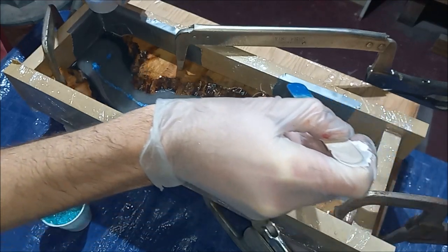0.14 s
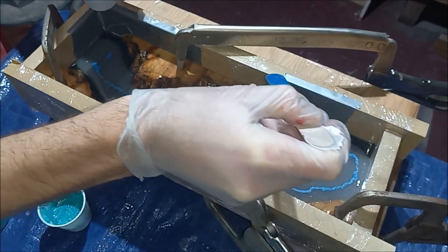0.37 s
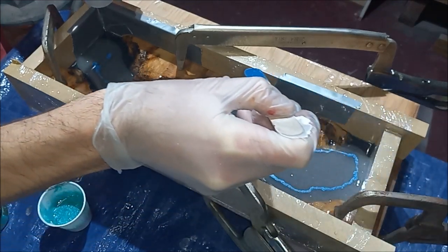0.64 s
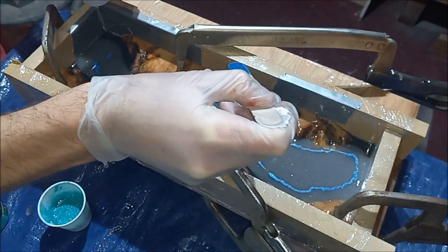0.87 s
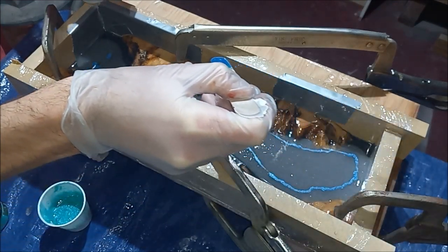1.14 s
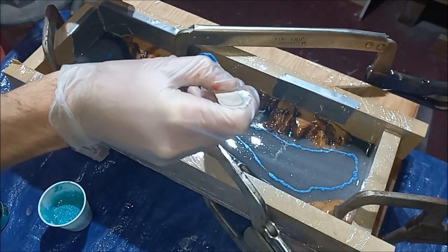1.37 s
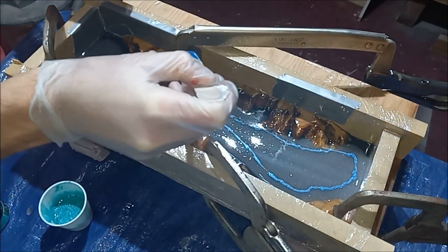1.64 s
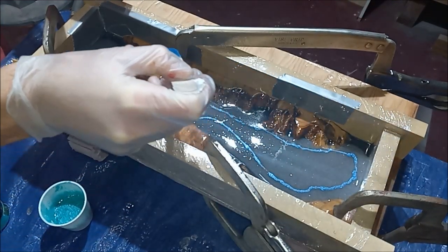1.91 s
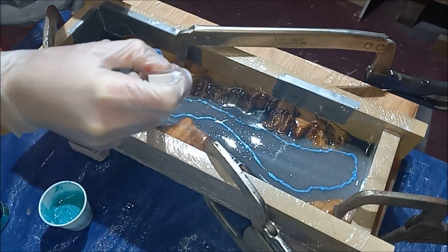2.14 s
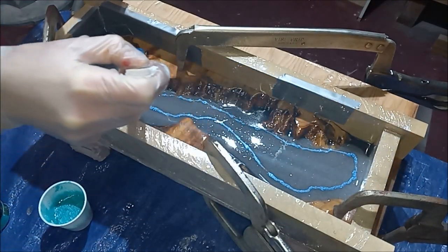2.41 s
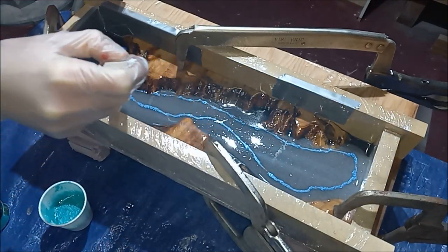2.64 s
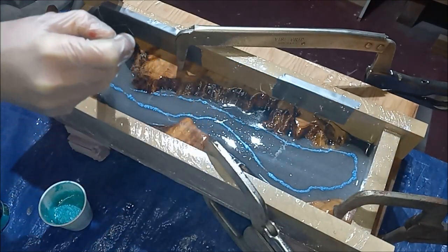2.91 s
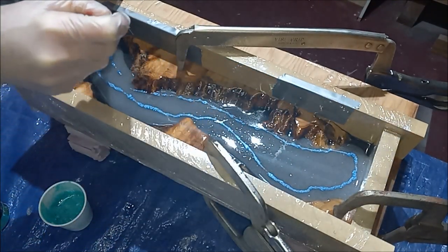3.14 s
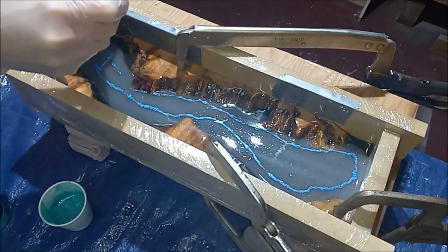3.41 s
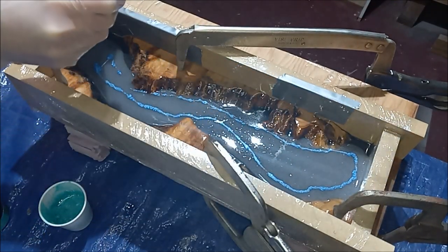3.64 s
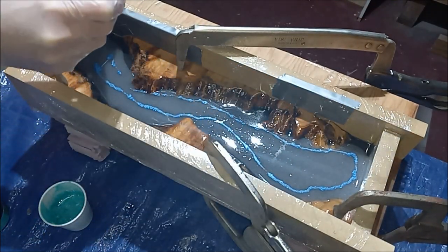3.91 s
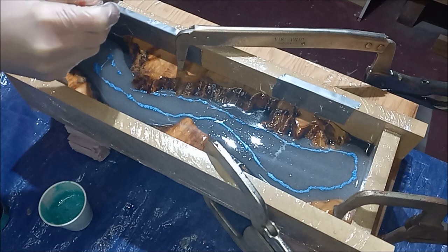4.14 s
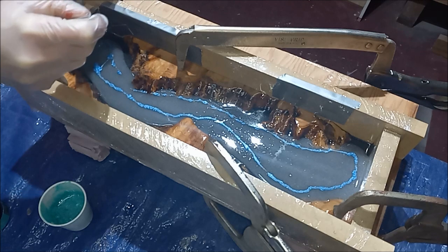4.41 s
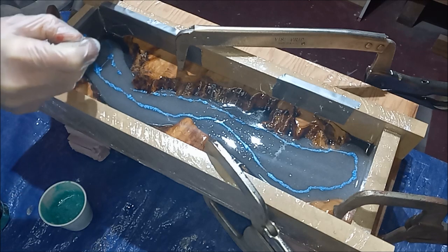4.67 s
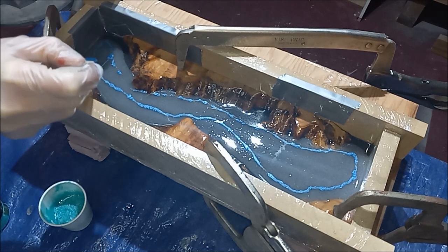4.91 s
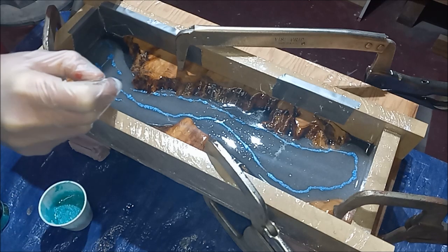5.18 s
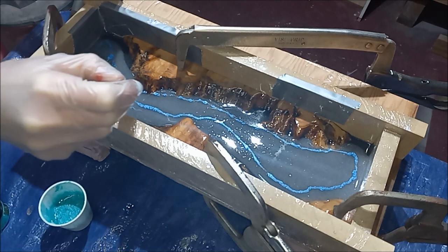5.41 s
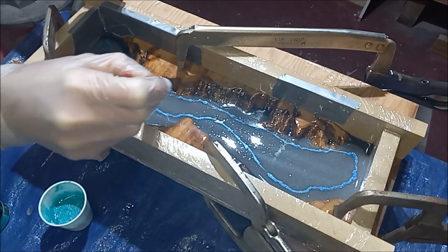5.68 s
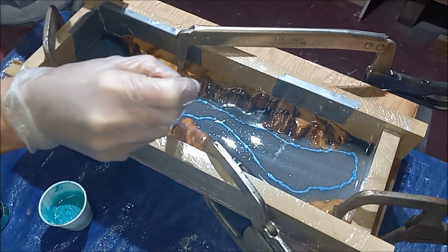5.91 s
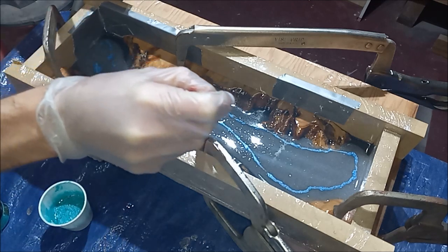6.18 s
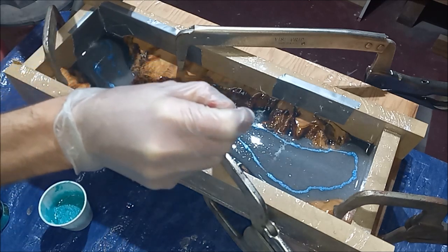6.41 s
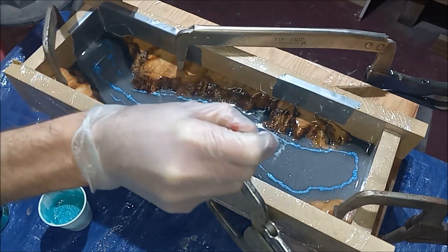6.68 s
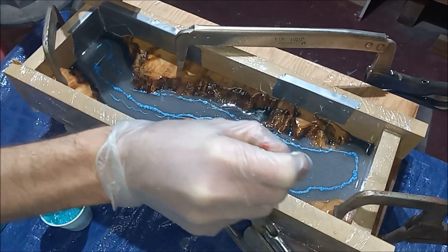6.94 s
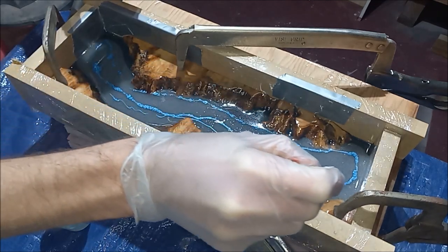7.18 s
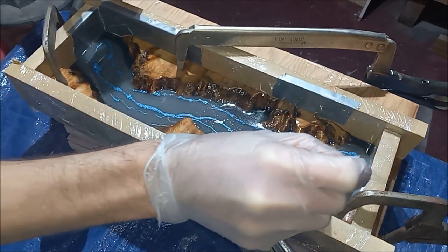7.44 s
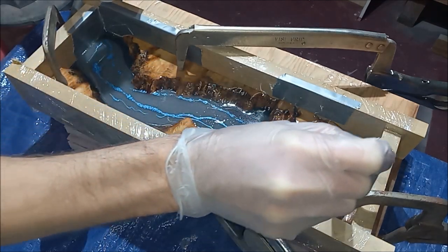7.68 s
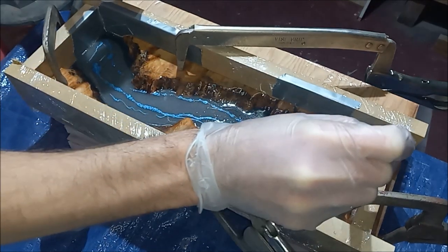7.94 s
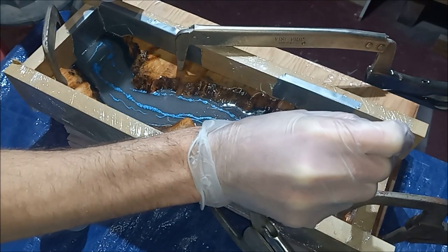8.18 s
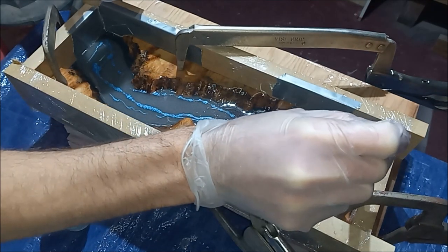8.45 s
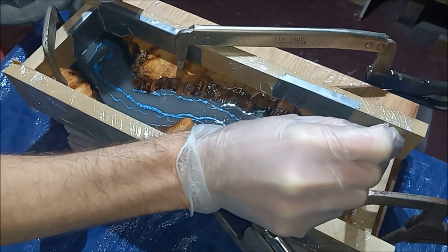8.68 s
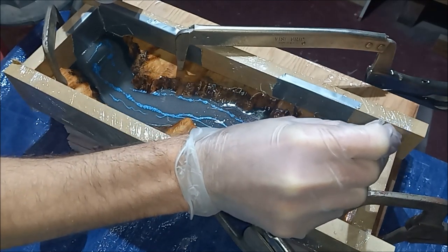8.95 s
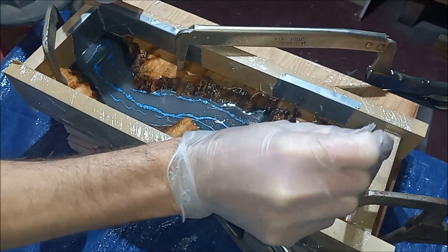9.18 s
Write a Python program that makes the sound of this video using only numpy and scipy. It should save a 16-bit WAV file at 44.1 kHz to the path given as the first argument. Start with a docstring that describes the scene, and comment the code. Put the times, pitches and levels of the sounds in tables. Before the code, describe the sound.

A deep, steady mains hum at about 120 hertz dominates from start to finish, clean and unwavering, over a dark rumble of fan air that fades toward the treble. A faint high microphone hiss lies on top. Close by, a thin glove makes tiny dry ticks: a weak one at 0.4 seconds followed by a faint rub at 0.6, two near 1.5 with a short scuff, then the sharpest at 2.6 with softer ones just after. A faint cluster comes at 3.1, a soft rub at 3.9, and a single tick at 4.4. Only hum and air remain until a faint tick and rub around 6.6 to 6.8. A clearer snap lands at 7.4, another lighter one at 7.8, a soft rub at 8.2. From 8.9 to 9.3 a tick and quick successive rubs form the strongest rustle, with a tiny brief squeak near 9.0. Ticks lean slightly left, with short room tails.

```python
"""A mains motor and its fan run evenly in a workshop: a steady hum at twice the mains frequency, made of locked sines,
over a rumble of air, which is noise coloured by room and casing, some narrow bands brighter and some duller.
Close by, a gloved hand ticks (clicks ringing the glove's modes), rubs (dense tiny slips through resonances)
and once squeaks (noise in a narrow resonance).
Two microphone ports hear the bass nearly alike and the treble apart, each with its own hiss on top."""
import sys
import numpy as np
from scipy import signal
from scipy.fft import rfft, irfft
from scipy.io import wavfile

SR = 44100
rng = np.random.default_rng(int(sys.argv[2]) if len(sys.argv) > 2 else 0)


def unload_audio(sound):
    """Save the sound as a 16-bit wav file, at the path given as the first command line argument."""
    columns = np.transpose(np.atleast_2d(sound))
    # keep every value between -1 and 1, then stretch to whole-number steps
    steps = np.round(np.clip(columns, -1, 1) * 32767)
    wavfile.write(sys.argv[1], SR, steps.astype(np.int16))


def magnitude_from_level(level_db):
    """Linear magnitude for a level in decibels (20 dB per decade)."""
    exponent = np.asarray(level_db, float) / 20
    return 10 ** exponent


N = 411012


def rms_one(x):
    """Scales a signal to rms 1."""
    return x / np.sqrt(np.mean(x ** 2) + 1e-20)


def at_hz(points, hz, axis=1):
    """Reads one column of a spectrum on a log-frequency axis."""
    points = np.array(points)
    return np.interp(np.log(hz + 1), np.log(points[:, 0]), points[:, axis])


def bump(hz, centre_hz, width_hz):
    """Shape of a resonance, 1 on top and a half at the edges of its width."""
    return 1 / (1 + (2 * (hz - centre_hz) / width_hz) ** 2)


def coloured(db_per_hz):
    """Gaussian noise with the given density at each frequency of the FFT."""
    white = rfft(rng.standard_normal(db_per_hz.shape[:-1] + (N,)))
    return irfft(white * magnitude_from_level(db_per_hz) * np.sqrt(SR / 2), N)


def ring(click, hz, t60):
    """A two-pole mode: a unit click sets a sine of height about 1 ringing and dying away."""
    radius = magnitude_from_level(-60 / (t60 * SR))
    angle = 2 * np.pi * hz / SR
    poles = [1, -2 * radius * np.cos(angle), radius * radius]
    return signal.lfilter([0, np.sin(angle)], poles, click + 1e-18)


def resonances(x, peaks):
    """Parallel band resonances with alternating signs."""
    out = 0
    for k, (hz, width_hz, level_db) in enumerate(peaks):
        radius = np.exp(-np.pi * width_hz / SR)
        poles = [1, -2 * radius * np.cos(2 * np.pi * hz / SR), radius * radius]
        zeros = [(1 - radius * radius) / 2, 0, (radius * radius - 1) / 2]
        out = out + (-1) ** k * magnitude_from_level(level_db) * signal.lfilter(zeros, poles, x)
    return out


def hum():
    """The iron core pulls twice per mains cycle: a locked series of clean, steady tones."""
    hum_hz = 120.0
    # Magnetic hum, one row per multiple of the hum pitch. Each row: left in dB rms, right in dB rms.
    multiples = [(-23.5, -23.5), (-44.5, -51.5), (-49.5, -49), (-58, -57.5), (-71, -59), (-64.5, -66),
                 (-60, -72.5), (-79, -76)]
    turn = 2 * np.pi * hum_hz * np.arange(N) / SR
    phases = rng.uniform(0, 2 * np.pi, len(multiples))
    out = 0
    for k, levels_db in enumerate(multiples):
        peaks = np.sqrt(2) * magnitude_from_level(levels_db)[:, None]
        out = out + peaks * np.sin((k + 1) * turn + phases[k])
    return out


def air():
    """Broad rumble coloured by room and casing; a shared and a differing part make left and right."""
    # Air through the fan, ahead of all colouring. Each row: frequency in Hz, density in dB per Hz.
    fan_air = [(25, -85.5), (46, -79.5), (62, -61), (82, -53), (115, -49.5), (150, -57.5), (250, -65.5),
               (400, -71), (800, -77.5), (1050, -84.5), (2000, -90), (4500, -98), (4900, -100),
               (5800, -103), (7000, -106), (9600, -116)]
    # What differs between the ports. Each row: frequency in Hz, level in dB over the fan air.
    port_difference = [(30, -6), (55, -11.5), (100, -17.5), (200, -13), (400, -4.5), (700, -5), (1000, 0),
                       (4000, 1), (6000, 0.5), (9000, 0)]
    # Room and casing colour of the shared part: narrow peaks and dips.
    # Each row: frequency in Hz, width in Hz, level change in dB.
    room_colour = [(52, 4, 0.5), (71, 7.9, 6), (71.2, 2.4, -8), (86.4, 9.1, 4.5), (101, 5.2, 6),
                   (188, 9.1, -2), (214.3, 19, 6.5), (220, 4.6, -1), (309.3, 29, 8), (449.6, 15, 5.5),
                   (527.5, 18, 4.5), (582, 22, 4), (680, 25, -1.5), (1299, 9.6, 6)]
    # Narrow bands of the fan air, some brighter and some duller.
    # Each row: frequency in Hz, width in Hz, level change in dB, left and right.
    fan_bands = [(1250, 20, 6.5, 0.5), (2370, 18, 7.5, 4), (3210, 16, 0, -1), (4190, 25, 9.5, 5.5),
                 (5170, 16, -1, 0), (6145, 25, -1.5, -3), (6500, 19, -3.5, 0.5), (7730, 220, 5, 9.5),
                 (8300, 290, 9.5, 1.5), (8550, 120, 6.5, 1), (8850, 300, 1, 1)]

    hz = np.arange(N // 2 + 1) * SR / N
    air_db = at_hz(fan_air, hz)
    room_db = sum(db * bump(hz, centre, width) for centre, width, db in room_colour)
    side_db = air_db + at_hz(port_difference, hz)
    mid, side = coloured(np.array([air_db + room_db, side_db]))
    bands_db = sum(np.outer(dbs, bump(hz, centre, width)) for centre, width, *dbs in fan_bands)
    return irfft(rfft([mid + side, mid - side]) * magnitude_from_level(bands_db), N)


def ticks():
    """A snap rings the glove's modes, most those near its pitch, with a bench echo and a short room tail."""
    # Ticks of the glove and, at 3.123 s, a faint echo of the tick before it. Each row: start in seconds,
    # level in dB, pitch in Hz around which it rings most, left over right in dB (snap only).
    snaps = [(0.357, -40, 3600, 2), (1.457, -36.5, 4300, 4), (1.5802, -38, 3100, 5),
             (2.6330, -29.5, 3000, 5), (2.6640, -45, 3200, 2.5), (2.7566, -39, 5300, 3.5),
             (3.1010, -45, 4200, 1), (3.1170, -39, 2500, 3), (3.1230, -47, 2700, 6),
             (4.4088, -39.5, 3100, 0.5), (6.611, -44, 3900, 0), (7.3824, -33, 2800, 5),
             (7.847, -38, 3600, 5), (8.921, -36, 2800, 0)]
    # Modes of the snapping glove. Each row: frequency in Hz, level in dB for a snap pitched there, t60 in seconds.
    glove_modes = [(1450, 0, .005), (1900, 0.5, 0.0044), (2350, 1, 0.0057), (2850, 1, 0.0045),
                   (3370, 2, 0.007), (4000, -1.5, 0.0054), (4700, -1.5, 0.0048), (5600, -1, .004),
                   (6700, -4.5, .004), (8200, 6, .004), (12600, 2, .003), (14800, 2, .003)]
    fall_db_per_octave, chance_db = 15, 3   # modes weaken away from the pitch; spread from snap to snap
    echo_s, echo_db = 0.0047, -12
    tail_db, tail_t60_s = -17.5, 0.12

    out, t = np.zeros((2, N + SR)), np.arange(SR // 4) / SR
    click = signal.lfilter(*signal.butter(2, 9000, fs=SR), t == 0)   # a soft contact
    rings = np.array([(-1) ** k * ring(click, hz, t60) for k, (hz, _, t60) in enumerate(glove_modes)])
    modes_hz, modes_db, _ = np.transpose(glove_modes)
    chances = rng.normal(0, chance_db, (len(snaps), len(glove_modes)))
    tail_band = signal.butter(2, [1500, 6000], "band", fs=SR, output="sos")
    tails = signal.sosfilt(tail_band, rng.standard_normal((len(snaps), 2, len(t))))
    lag = round(echo_s * SR)
    for (start_s, level_db, pitch_hz, pan_db), chance, tail in zip(snaps, chances, tails):
        octaves_away = abs(np.log2(modes_hz / pitch_hz))
        snap = magnitude_from_level(modes_db + chance - fall_db_per_octave * octaves_away) @ rings
        snap[lag:] += magnitude_from_level(echo_db) * snap[:-lag]
        panned = snap * magnitude_from_level([[pan_db / 2], [-pan_db / 2]])
        room_tail = tail * magnitude_from_level(tail_db - 60 * t / tail_t60_s)
        first = round(start_s * SR)
        out[:, first:first + len(t)] += magnitude_from_level(level_db) * (panned + room_tail)
    return out[:, :N]


def stroke(start_s, length_s, fade_t60_s):
    """Loudness of a hand stroke: swells for 0.3 of its length, holds at 1, then dies away after it."""
    t = np.arange(N) / SR - start_s
    swell = np.clip(t / (0.3 * length_s), 0, 1)
    return swell * magnitude_from_level(-60 * np.maximum(t - length_s, 0) / fade_t60_s)


def rubs():
    """Dense tiny slips, drawn apart for each port as the room makes them differ, excite the unevenly held glove."""
    # Strokes of the rubbing glove. Each row: start in seconds, length in seconds, level of the low resonances
    # in dB rms under an even grip, middle and high resonances in dB against the low ones.
    strokes = [(0.57, 0.036, -57, -1.5, -8.5), (1.576, .024, -51, -5.5, -20), (3.073, .047, -60, -6, -12.5),
               (3.909, 0.06, -54.5, -3, -6), (6.777, .07, -61, -3, -10), (8.186, .05, -57.5, -3.5, -9.5),
               (8.925, 0.05, -44, -1.5, -9.5), (8.984, .04, -51, -4.5, -15.5),
               (9.031, 0.05, -52, -5.5, -14), (9.085, .04, -57, -0.5, -13),
               (9.132, .12, -63.5, -1.5, -12.5), (9.254, .07, -58.5, -2.5, -14)]
    # Resonances of the rubbed glove. Each row: frequency in Hz, width in Hz, level in dB within its group.
    low_peaks = [(1700, 250, -5), (2260, 350, 0), (2780, 320, 1), (3250, 200, 0)]
    mid_peaks = [(4000, 500, 1.5), (4500, 430, 1), (5200, 350, -0.5), (6150, 560, -3.5), (6640, 270, -6)]
    high_peaks = [(7100, 610, -0.35), (8250, 680, -1.7)]
    top_peaks = [(10500, 2900, -5.5), (12600, 650, -6.5), (14500, 1600, -10.5)]
    slips_per_s, slip_spread_db = 12000, 2
    # Top against high resonances in a firm stroke; dB lost per dB softer than firm.
    top_over_high_db, top_follows, firm_db = -1.5, 0.6, -44.5
    uneven_db, uneven_hz = 1.2, 40   # the grip catches and lets go

    sizes = magnitude_from_level(slip_spread_db * np.minimum(rng.exponential(1, (2, N)), 5))
    signs = rng.choice([-1, 1], (2, N))
    slips = sizes * signs * (rng.random((2, N)) < slips_per_s / SR)
    groups = (low_peaks, mid_peaks, high_peaks, top_peaks)
    low, mid, high, top = (rms_one(resonances(slips, peaks)) for peaks in groups)
    grip_filter = signal.butter(2, uneven_hz, fs=SR, output="sos")
    grip = rms_one(signal.sosfilt(grip_filter, rng.standard_normal(N)))
    out = 0
    for start_s, length_s, level_db, mid_db, high_db in strokes:
        top_db = high_db + top_over_high_db + top_follows * (level_db - firm_db)
        colour = low + mid * magnitude_from_level(mid_db) + high * magnitude_from_level(high_db) + top * magnitude_from_level(top_db)
        out = out + magnitude_from_level(level_db) * stroke(start_s, length_s, fade_t60_s=0.15) * colour
    return out * magnitude_from_level(uneven_db * grip)


def squeak():
    """One rub squeaks briefly: noise passes twice through one narrow resonance, alike at both ports."""
    peak = [(3000, 99, 0)]   # Hz, width in Hz, dB
    narrow = rms_one(resonances(resonances(rng.standard_normal(N), peak), peak))
    return narrow * magnitude_from_level(-50.5) * stroke(start_s=8.987, length_s=0.048, fade_t60_s=0.03)


def hiss():
    """Each microphone port has its own steady noise."""
    # Microphone hiss. Each row: frequency in Hz, left in dB per Hz, right in dB per Hz.
    port_hiss = [(8000, -120, -120), (9800, -116, -113), (10500, -108, -104), (12300, -105, -103.5),
                 (13000, -105, -104), (16000, -103, -104)]
    hz = np.arange(N // 2 + 1) * SR / N
    return coloured(np.array([at_hz(port_hiss, hz, axis=1), at_hz(port_hiss, hz, axis=2)]))


def scene():
    """Machine, hand and microphone noise together."""
    return hum() + air() + ticks() + rubs() + squeak() + hiss()


def low_pass(x):
    """Removes everything above the highest recorded frequency."""
    return signal.sosfilt(signal.butter(12, 15890, fs=SR, output="sos"), x)


def record(dry):
    """The recorder cuts everything from 15740 Hz up, steeply."""
    kept = np.arange(N // 2 + 1) * SR / N < 15740
    mix = irfft(rfft(dry) * kept, N)
    return low_pass(mix)


dry = scene()
out = record(dry)
unload_audio(out)
```